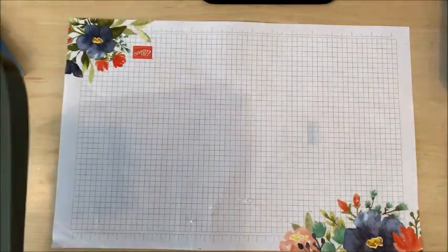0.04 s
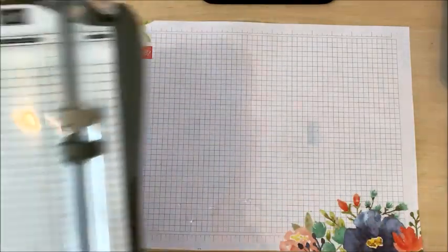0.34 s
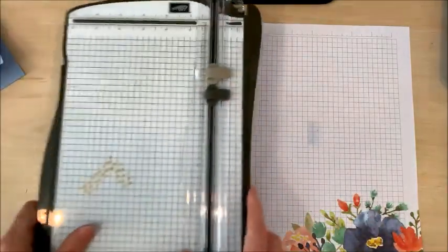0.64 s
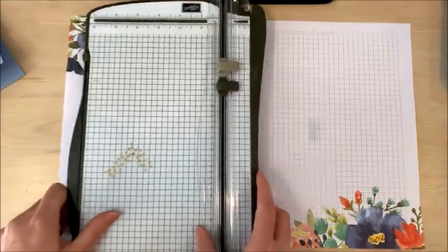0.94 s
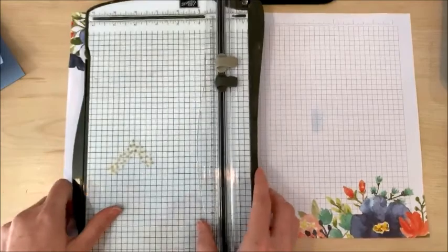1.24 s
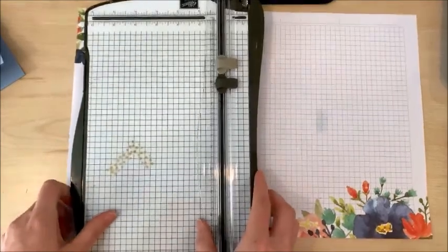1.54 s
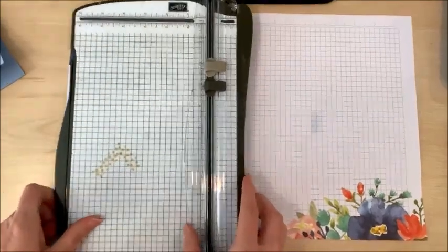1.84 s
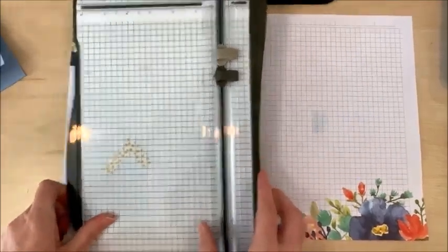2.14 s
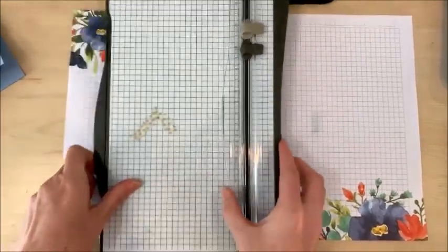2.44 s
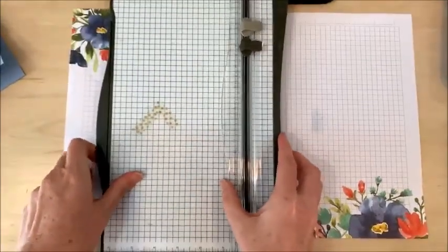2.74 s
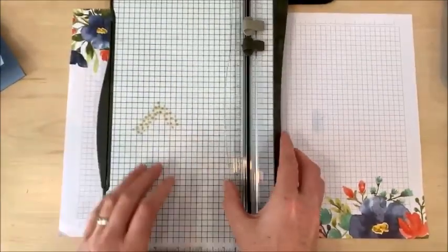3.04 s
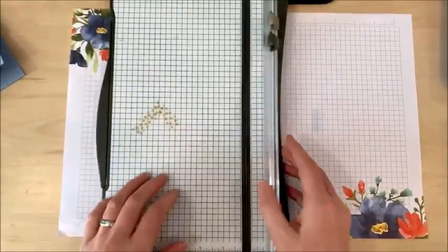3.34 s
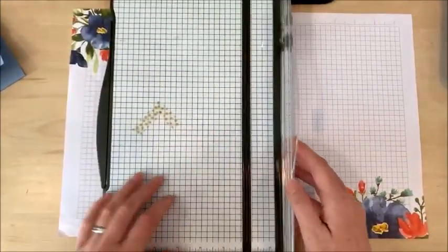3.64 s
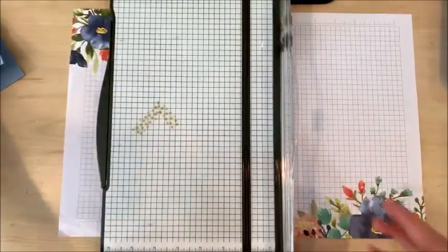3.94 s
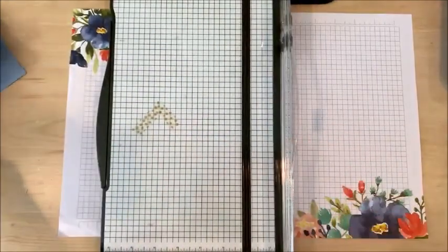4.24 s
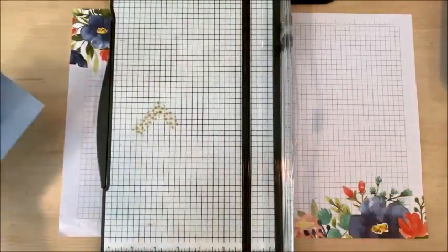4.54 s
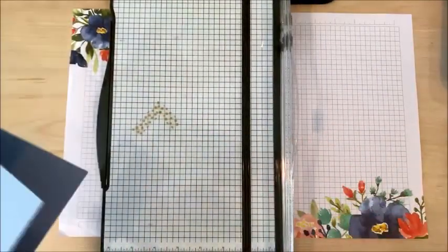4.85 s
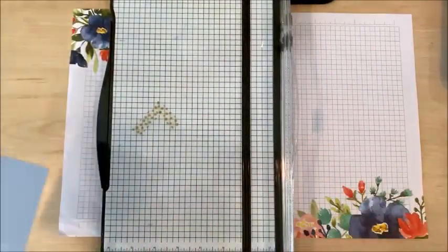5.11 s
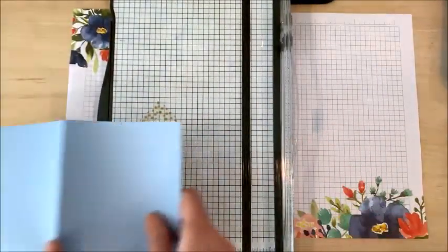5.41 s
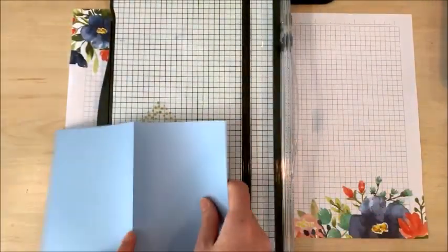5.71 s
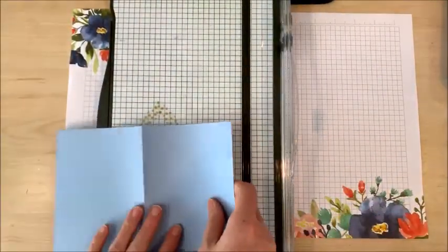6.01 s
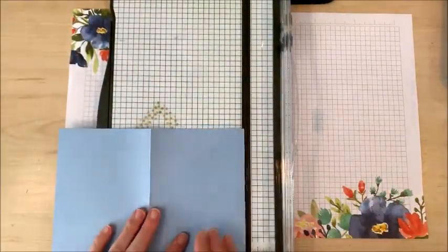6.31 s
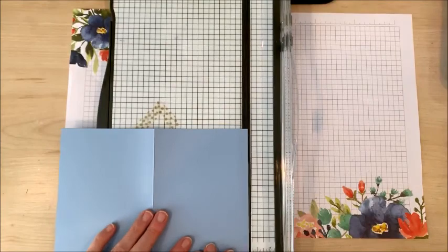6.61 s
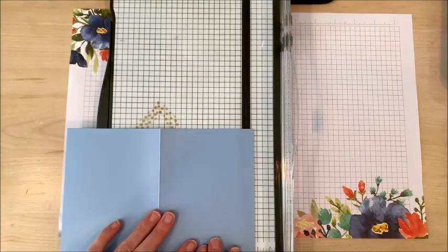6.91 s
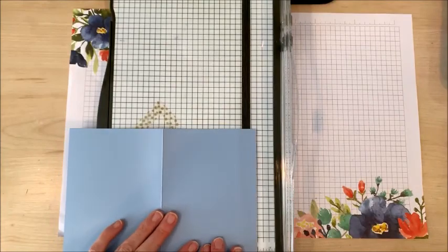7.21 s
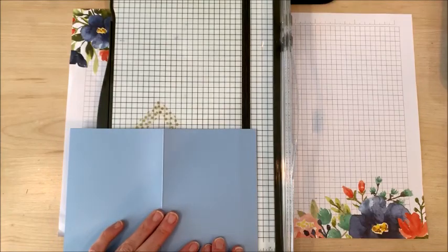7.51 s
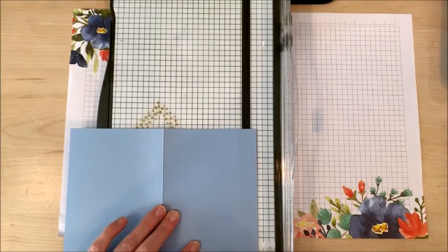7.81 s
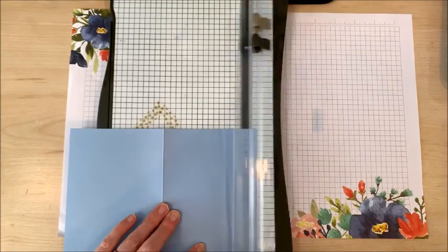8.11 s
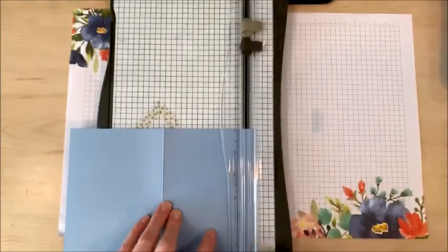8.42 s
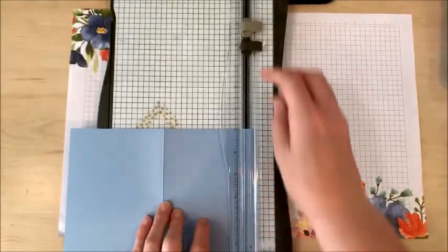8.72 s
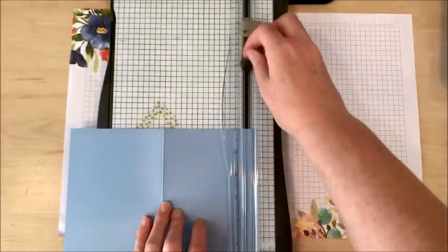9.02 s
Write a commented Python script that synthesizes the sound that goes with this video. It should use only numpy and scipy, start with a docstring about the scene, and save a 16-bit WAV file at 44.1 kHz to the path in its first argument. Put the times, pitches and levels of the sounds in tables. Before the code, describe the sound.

A plastic paper trimmer is set down and shuffled with light knocks, then card slides across it and its rail snaps shut.

```python
"""Light taps and a soft scrape come first: a plastic paper trimmer is carried onto a craft mat in a small
room, set down, shuffled and dropped into place. Its rail lifts with a squeak, a folded card slides across
the bed (the flat base), and the rail snaps shut. Each knock rings the same plastic bed; the snap rings the
rail. Sliding is a hiss full of tiny slips, and the rubber feet and the card's edge judder as they stick and
let go. Underneath, the bed rumbles as hands lean on it, and the room's air murmurs."""
import sys
import numpy as np
from scipy import signal
from scipy.fft import rfft, irfft, next_fast_len
from scipy.io import wavfile
from scipy.ndimage import uniform_filter1d

SR = 44100
rng = np.random.default_rng(int(sys.argv[2]) if len(sys.argv) > 2 else 0)


def wav_out(sig):
    """Save sig, one row per channel (or a flat mono array), as 16-bit PCM at SR to the path in sys.argv[1]."""
    wavfile.write(sys.argv[1], SR, np.round(np.clip(np.atleast_2d(sig).T, -1, 1) * 32767).astype(np.int16))


N = 399546

# knocks on the bed: t/s, level/dB, then added to that level: bass/dB, clack/dB, treble/dB; looseness/dB
KNOCKS = [(0.002, -47.5, -15, 0.5, -12, 1), (0.054, -45.5, -17, -0.5, -12.5, 0),
          (0.184, -48.5, -13.5, -0.5, -11.5, 3.5), (0.512, -56.5, -9, -5, -21, -5.5),
          (0.953, -52.5, -13, -12.5, 1.5, 0.5), (1.012, -28, -3, -9, -20, 4.5),
          (1.109, -47, 4, -10, -23, -4.5), (1.223, -46, -5, -12, -21.5, -1), (1.268, -36, 6, -10, -20.5, 1),
          (1.495, -47, -12.5, -14.5, -12.5, 0), (1.762, -47, 1, -7.5, -16, 2),
          (1.83, -50, 3, 1.5, -12, 4.5), (1.843, -55.5, 2, 8, 11, -5.5), (1.856, -42.5, -7, -3, -6, 2.5),
          (2.208, -51.5, -1.5, -6, -11, 5.5), (2.471, -44.5, -6, -14.5, -19, 4.5),
          (2.525, -25.5, -19, -3, -14, 7), (2.528, -16.5, -8.5, -10.5, -26, -2),
          (2.558, -34.5, 3.5, 0.5, -2, -1.5), (2.732, -50, -8, -7, -16, -1),
          (2.804, -46, -2.5, -13.5, -25, -2.5), (2.979, -50.5, -15, 0, -3.5, 1.5),
          (3.087, -46, -3, -9, -17, 1), (3.426, -52, 3, -3, -14, 4), (3.451, -48, -1.5, -2, -12.5, 2.5),
          (3.484, -53.5, -8, 4, -15, -9), (3.655, -56, 1.5, -5, -17, 1.5),
          (4.968, -39.5, 0.5, -0.5, -9, 0.5), (5.203, -54.5, -4.5, 0.5, -5.5, -3.5),
          (5.649, -40, -13, -9.5, -18, 3), (5.743, -26.5, -19, -1.5, -7, 4.5),
          (5.761, -29, -9, -12, -3.5, -2.5), (6.022, -48.5, -12, 3.5, -14, -0.5),
          (7.614, -44.5, -13.5, -5.5, -24, -2.5), (7.868, -39, -15, -7, -15, -3),
          (7.961, -49.5, 0, -4.5, -13.5, 9), (7.995, -48, -3, -6.5, -15, 4),
          (8.073, -42, -16, -6, -14.5, 1), (8.132, -47.5, -6, -3.5, -11, 1.5),
          (8.172, -33, 1, -4.5, -3.5, -0.5), (8.742, -57, -4, -1.5, -0.5, -5.5),
          (8.87, -54, -5, -2.5, -11, -2)]
# borders of a hit's five bands (thud, bass, middle, clack, treble): f/Hz
HIT_BANDS = [35, 130, 400, 1200, 5000, 15000]
# notes the bed rings with: f/Hz, relative level/dB, time to fade by 60 dB/s
BED_NOTES = [(76, -6, 0.17), (99.6, -4.5, 0.27), (205, -2, 0.089), (251, 3.5, 0.12), (412.6, -6.5, 0.23),
             (583.5, 5, 0.088), (637.5, 3.5, 0.11), (659.6, -1, .1), (812, 1, 0.061), (926, 2.5, 0.12),
             (1021, 0.5, 0.18), (1200, -3.5, .07), (1510, -4, 0.059), (1795, 0, 0.11)]
# tone colour of a knock on the bed: f/Hz, relative level/dB
BED_COLOUR = [(35, -7.5), (110, 1), (260, -2), (450, -4.5), (620, -1.5), (1000, -1), (1300, -0.5),
              (2000, 1.5), (3200, -1), (6000, -4.5), (9500, 1.5), (12500, -6.5), (15000, -16.5)]
# the rail snapping shut: t/s, thud/dB, bass/dB, middle/dB, clack/dB, treble/dB, contact/s, relative echo/dB
RAIL_SNAP = [(8.1568, -28.5, -31, -25, -21.5, -17.5, 0.0016, 1.5)]
# notes the rail rings with in its frame: f/Hz, relative level/dB, time to fade by 60 dB/s
RAIL_NOTES = [(68, 3.5, 0.12), (108, 2.5, 0.21), (302, -2, 0.099), (418, 1, 0.2), (620, 1, 0.11),
              (645, 1, 0.17), (2130, 0.5, .15), (3200, -2.5, 0.13), (3950, -6, .12), (4170, -1.5, .15),
              (5710, -7.5, .15), (6700, -2.5, .15), (6900, -1, 0.13), (8990, 1, .12), (9245, -4, .12),
              (9200, -3, .12), (11400, -3.5, .12)]
# tone colour of the snap: f/Hz, relative level/dB
SNAP_COLOUR = [(35, 2), (110, 3), (200, -2.5), (1000, 0), (1300, -8), (2100, 5), (3000, 0), (4200, 2),
               (5400, -2.5), (7000, 1), (9500, 2), (12000, -3.5), (15500, -17.5)]
# pushes of the trimmer over the mat: t/s, length/s, level/dB, relative treble/dB
MAT_PUSHES = [(0, 0.38, -59.5, -3.5), (.18, 0.093, -57.5, 4.5), (.36, .2, -57.5, -2),
              (.61, 0.077, -54.5, -6.5), (.69, 0.21, -57, -10.5), (.88, 0.21, -62.5, 2),
              (1.13, 0.14, -54.5, -11), (1.23, .04, -41, -21), (1.35, 0.16, -63, -1),
              (1.57, .12, -46.5, -14), (1.77, 0.046, -53, -10), (2.03, 0.045, -66, 3)]
# tone colour of rubbing on the mat: f/Hz, relative level/dB
MAT_COLOUR = [(60, 8), (260, 2.5), (420, -4), (680, 10.5), (850, 1.5), (1080, 3.5), (1350, -3), (1850, -2),
              (2600, -11), (5500, -15), (7500, -12), (10000, -12), (12500, -18), (15000, -23)]
# strokes of the card and fingers over the bed: t/s, length/s, level/dB, relative treble/dB
CARD_STROKES = [(3.55, 0.546, -70, -2), (4.16, 0.25, -57.5, -1.5), (4.28, 0.053, -53, 1),
                (4.372, 0.014, -52.5, 7), (4.44, .22, -63.5, 0), (4.66, .3, -60.5, -3.5),
                (4.74, 0.23, -65, 12.5), (5.04, 0.087, -49.5, 3), (5.14, 0.28, -60.5, -0.5),
                (5.29, 0.064, -60.5, 7), (5.44, 0.047, -54, 2), (5.52, .12, -59, -3.5),
                (5.62, 0.087, -49.5, -1), (5.705, 0.054, -39.5, 1), (5.9, 0.22, -51, -1),
                (6.08, 0.058, -58, 11.5), (6.1, 0.53, -64.5, -7), (6.55, 0.047, -72, 8),
                (6.62, 0.37, -75, -5), (7.73, 0.078, -68, 2.5), (8.43, 0.21, -65.5, -2),
                (8.7, .04, -68.5, 5.5), (8.92, 0.17, -62.5, -8.5)]
# tone colour of the sliding card: f/Hz, relative level/dB
PAPER_COLOUR = [(60, 6.5), (200, -5), (400, 0), (800, -0.5), (1500, 3.5), (2600, -0.5), (4000, -4.5),
                (6500, -6.5), (9300, -2), (12000, -9), (15000, -15)]
# borders of a slide's three bands (bass, middle, treble): f/Hz
SLIDE_BANDS = [60, 400, 3500, 15000]
# rubber feet and card edge sticking and slipping: t/s, length/s, f/Hz, pitch spread/Hz, level/dB
STICK_SLIPS = [(1.101, 0.032, 276, 45, -39), (1.579, 0.045, 238, 30, -44), (1.623, 0.061, 693, 300, -49),
               (1.673, 0.039, 248, 30.4, -43), (4.329, .03, 1997, 497, -43.5),
               (5.71, .045, 2626, 403, -35.5), (5.724, 0.018, 1620, 400, -33),
               (5.95, 0.13, 2850, 700, -51.5), (6.077, 0.076, 2715, 590, -46.5),
               (6.101, .6, 1443, 70, -64.5)]
# path of the hinge's note: t/s, f/Hz, level/dB
HINGE_NOTE = [(3.377, 7600, -61.5), (3.384, 7390, -40.5), (3.388, 7260, -50.5), (3.398, 7260, -41),
              (3.409, 7230, -42.5), (3.416, 7350, -39.5), (3.422, 7400, -66)]
# hands leaning on the bed: t/s, length/s, level/dB
HAND_PRESSES = [(0, .8, -67), (.85, .05, -57), (1.135, 0.19, -54), (1.58, 0.39, -55.5), (2.98, .3, -62.5),
                (3.681, .07, -58), (3.917, 0.66, -61), (4.765, 0.3, -58.5), (5.663, 0.22, -50.5),
                (5.9, 0.4, -60.5), (6.25, 0.61, -64), (7.948, 0.24, -46.5), (8.45, 0.31, -68),
                (8.71, 0.12, -59.5), (8.86, 0.22, -58.5)]
# tone colour of the bending bed: f/Hz, relative level/dB
RUMBLE_COLOUR = [(25, -13.5), (60, -1.5), (110, -2), (200, -12), (400, -11), (800, -33), (3000, -71)]
# how long the room echoes: f/Hz, time to fade by 60 dB/s
ROOM_FADE = [(60, .36), (250, .3), (1000, 0.32), (4000, 0.35), (9000, 0.31), (15000, 0.27)]
# tone colour of the room's air: f/Hz, relative level/dB
AIR_COLOUR = [(12, -27), (20, -9.5), (59, -1.5), (148, -15.5), (191, -8.5), (232, -14.5), (478, -17.5),
              (614, -15), (667, -18.5), (811, -16), (1410, -23.5), (13500, -36), (15500, -37)]


def bed_knock(level_db, bass_db, clack_db, treble_db, loose_db):
    """A knock rings the bed: a hard one is short and stands out of its echoes, a loose one chatters on."""
    harder_db = level_db + 44.5  # how far above an ordinary tap
    contact_s = .0041 * amp(.5 * loose_db - .28 * harder_db)
    echo_db = -5 + loose_db - .3 * harder_db
    bands_db = level_db + np.array([bass_db - 3.5, bass_db, 0, clack_db, treble_db])
    return plastic_hit(bands_db, contact_s, echo_db, BED_NOTES, BED_COLOUR, ring_db=-21, spacing_hz=240,
                       high_db=-7.5, high_fade_s=.091, rattle_db=-20.5, rattle_fade_s=.31)


def rail_snap(bands_db, contact_s, echo_db):
    """The rail shuts with a sharp click, a very short rattle and a bright ring."""
    return plastic_hit(bands_db, contact_s, echo_db - 2, RAIL_NOTES, SNAP_COLOUR, ring_db=-28.5,
                       spacing_hz=45, high_db=-20, high_fade_s=.082, rattle_db=-15, rattle_fade_s=.035)


def plastic_hit(bands_db, contact_s, echo_db, notes, colour, ring_db, spacing_hz,
                high_db, high_fade_s, rattle_db, rattle_fade_s):
    """A brief chatter of contact sets the plastic ringing, and the walls echo both."""
    t = np.arange(SR // 3) / SR
    progress = t / max(contact_s, 1e-4)
    rise = 1 - np.exp(-progress)
    fall_db = -60 * t  # divided by a fade time, this drops 60 dB in that time
    pulse = progress * np.exp(1 - progress)
    rattle = rise * amp(rattle_db + fall_db / rattle_fade_s)
    chatter = (pulse + rattle) * noise(colour, len(t))
    ring = sum(rng.choice([-1, 1]) * amp(ring_db + db + fall_db / fade_s) * np.sin(2 * np.pi * hz * t)
               for hz, db, fade_s in notes)
    high_ring = amp(high_db + fall_db / high_fade_s) * overtones(colour, len(t), spacing_hz)
    ring = rise * (ring + high_ring)
    # the walls hear the contact from all sides, so a click of its average colour is blended in
    click = unit_level(tint(signal.unit_impulse(len(t)), colour)) * np.std(chatter)
    to_walls = (click + chatter) / np.sqrt(2) + ring
    echoes = amp(echo_db) * signal.fftconvolve(to_walls, room_echo())[:len(t)]
    hit = balance_bands(chatter + ring + echoes, bands_db)
    return balance_bands(hit, bands_db)  # a second pass lands closer to the levels


def overtones(colour, size, spacing_hz, lowest_hz=700):
    """The plastic's crowd of higher notes; each spot that is struck wakes its own scattered set."""
    hz = np.fft.rfftfreq(size, 1 / SR)
    picked = (rng.random(len(hz)) < hz[1] / spacing_hz) & (hz > lowest_hz)
    spectrum = picked * amp(value_at(colour, hz)) * rfft(rng.standard_normal(size))
    return unit_level(irfft(spectrum, size))


def balance_bands(hit, bands_db):
    """Tints a hit so that each band of its first 30 ms comes near the given level."""
    count = round(.03 * SR)
    onset = hit[:count] * signal.windows.tukey(2 * count, .2)[count:]
    power = abs(rfft(onset, SR)) ** 2 * 2 / (count * SR)  # one value per Hz
    onset_db = 10 * np.log10(np.add.reduceat(power, HIT_BANDS)[:-1])
    centres_hz = np.sqrt(np.multiply(HIT_BANDS[:-1], HIT_BANDS[1:]))
    return tint(hit, np.column_stack([centres_hz, bands_db - onset_db]))


def sliding(moves, colour, slips_per_s, spread_db, grain_db, uneven_db, echo_db, bass_db):
    """Rubbing hisses under uneven pressure, with tiny sharp slips where fibres catch."""
    starts, lengths, level_db, treble_db = np.transpose(moves)
    slips = rng.random(N) < slips_per_s / SR
    sizes = amp(spread_db * np.minimum(rng.exponential(1, N), 3))
    grains = signal.lfilter([1], [1, -np.exp(-1 / (.001 * SR))], slips * sizes)  # 1 ms tail on each slip
    roughness = 1 + amp(grain_db) * unit_level(grains)
    pressure = amp(uneven_db * wander(N, span=600))
    rubbing = in_room(noise(colour, N) * pressure * roughness, echo_db)
    sound = np.zeros(N)
    for low, high, db in zip(SLIDE_BANDS, SLIDE_BANDS[1:], [bass_db, 0, treble_db]):
        band = signal.sosfilt(signal.butter(3, [low, high], "band", fs=SR, output="sos"), rubbing)
        sound += stroke_loudness(starts, lengths, level_db + db) * unit_level(band)
    return sound


def judder(length, hz, spread_hz, db):
    """A surface catches and lets go at a wandering rate and strength."""
    t = np.arange(int(length * SR)) / SR
    a, b = uniform_filter1d(rng.standard_normal((2, len(t))), size=int(SR / spread_hz), mode="wrap")
    flutter = uniform_filter1d(a + 1j * b, size=int(SR / spread_hz / 2))
    tone = (flutter * np.exp(2j * np.pi * hz * t)).real
    return amp(db) * unit_level(signal.windows.tukey(len(t), .4) * tone) / np.sqrt(2)


def hinge_squeak(octave_db=-19, waver=.0058):
    """The hinge sings one thin, wavering note with a faint octave above it."""
    times, hz, db = np.transpose(HINGE_NOTE)
    t = np.arange(times[0], times[-1], 1 / SR)
    pitch = np.interp(t, times, hz) * (1 + waver * wander(len(t), span=60))
    phase = 2 * np.pi * np.cumsum(pitch) / SR
    tone = np.sin(phase) + amp(octave_db) * np.sin(2 * phase)
    return amp(np.interp(t, times, db)) * unit_level(tone)


def bed_rumble():
    """The bed bends and rumbles softly while hands lean on it."""
    return stroke_loudness(*np.transpose(HAND_PRESSES)) * noise(RUMBLE_COLOUR, N)


def room_echo(walls_s=.012, desk_db=-12):
    """Echoes of one click: weak ones off the desk, then the walls, each pitch fading at its own speed."""
    hz, t, spectra = signal.stft(rng.standard_normal(SR * 2 // 5), SR, nperseg=256)
    fade = amp(-60 * t / value_at(ROOM_FADE, hz)[:, None])
    tail = signal.istft(spectra * fade, SR, nperseg=256)[1]
    t = np.arange(len(tail)) / SR
    tail *= uniform_filter1d(np.where(t < walls_s, amp(desk_db) * t / walls_s, 1), size=150)
    return tail / np.linalg.norm(tail)


def in_room(x, echo_db):
    """A sound with its echoes."""
    return x + amp(echo_db) * signal.fftconvolve(x, room_echo())[:len(x)]


def room_air(level_db=-63.5):
    """The room's air is a faint, steady, low murmur."""
    return amp(level_db) * noise(AIR_COLOUR, N)


def stroke_loudness(starts, lengths, levels_db, rise_share=.41, longest_rise_s=.046, release_s=.029):
    """Loudness of a run of hand movements: each gathers speed, holds and comes to rest."""
    power = np.zeros(N)
    for start, length, db in zip(starts, lengths, levels_db):
        t = np.arange(round((length + 5 * release_s) * SR)) / SR
        rise = np.minimum(t / min(rise_share * length, longest_rise_s), 1)
        release = np.exp(-np.maximum(t - length, 0) / release_s)
        add(power, start, (amp(db) * rise * release) ** 2)
    return np.sqrt(power)


def noise(colour, size):
    """Noise of level 1 with the given tone colour."""
    n = next_fast_len(size)
    gain = amp(value_at(colour, np.fft.rfftfreq(n, 1 / SR)))
    return unit_level(irfft(rfft(rng.standard_normal(n)) * gain, n)[:size])


def wander(size, span):
    """A random drift of level 1, smoothed over span samples."""
    return unit_level(uniform_filter1d(rng.standard_normal(size), span))


def tint(x, colour):
    """Gives a sound a tone colour without smearing its start backwards."""
    n = next_fast_len(len(x))
    log_gain = np.log(amp(value_at(colour, abs(np.fft.fftfreq(n, 1 / SR)))))
    response = np.exp(signal.hilbert(log_gain).conj())
    return np.fft.ifft(np.fft.fft(x, n) * response).real[:len(x)]


def value_at(table, hz):
    """Looks up a value between a table's frequencies, with octaves evenly spaced."""
    f, value = np.transpose(table)
    return np.interp(np.log(hz + 1), np.log(f), value)


def amp(db):
    """Turns decibels into a multiplier."""
    return 10 ** (np.asarray(db) / 20)


def unit_level(x):
    """Scales a sound to an average (rms) level of 1."""
    return x / np.sqrt(np.mean(x ** 2) + 1e-20)


def add(mix, start, sound):
    """Mixes a sound in, start seconds from the beginning."""
    part = mix[max(0, round(start * SR)):][:len(sound)]
    part += sound[:len(part)]


def scene():
    """Knocks, the snap, sliding and squeaks over the rumble and the quiet air."""
    mix = room_air() + bed_rumble()
    for start, *knock in KNOCKS:
        add(mix, start, bed_knock(*knock))
    for start, *bands_db, contact_s, echo_db in RAIL_SNAP:
        add(mix, start, rail_snap(bands_db, contact_s, echo_db))
    mix += sliding(MAT_PUSHES, MAT_COLOUR, slips_per_s=110, spread_db=5.5, grain_db=-12,
                   uneven_db=3.5, echo_db=.5, bass_db=-11.5)
    mix += sliding(CARD_STROKES, PAPER_COLOUR, slips_per_s=180, spread_db=.5, grain_db=-11.5,
                   uneven_db=2, echo_db=-6, bass_db=-8.5)
    squeaks = np.zeros(N)
    for start, *slip in STICK_SLIPS:
        add(squeaks, start, judder(*slip))
    add(squeaks, HINGE_NOTE[0][0], hinge_squeak())
    return (mix + in_room(squeaks, echo_db=-10))[None]


def record(dry, lowest_hz=26, peak_limit=.92, highest_hz=15900):
    """The microphone drops the deepest bass and rounds off the biggest peaks; the top treble is cut."""
    x = signal.sosfilt(signal.butter(3, lowest_hz, "high", fs=SR, output="sos"), dry)
    x = x / (1 + (x / peak_limit) ** 6) ** (1 / 6)
    treble_cut = signal.firwin(301, highest_hz, window=("kaiser", 9), fs=SR)
    return signal.oaconvolve(x, treble_cut[None], "same")


dry = scene()
out = record(dry)
wav_out(out)
```